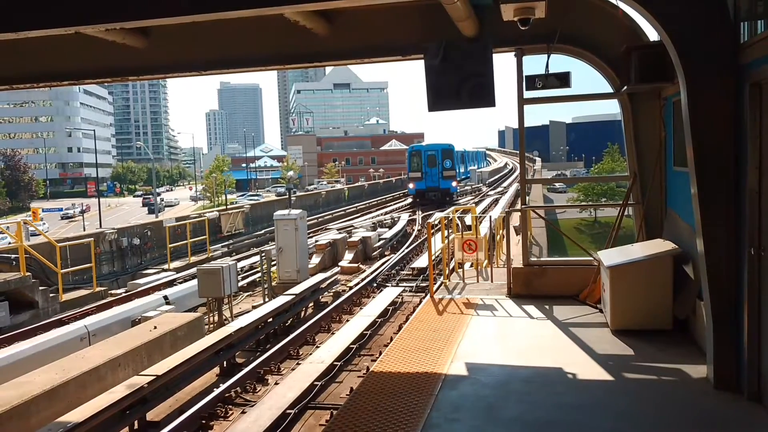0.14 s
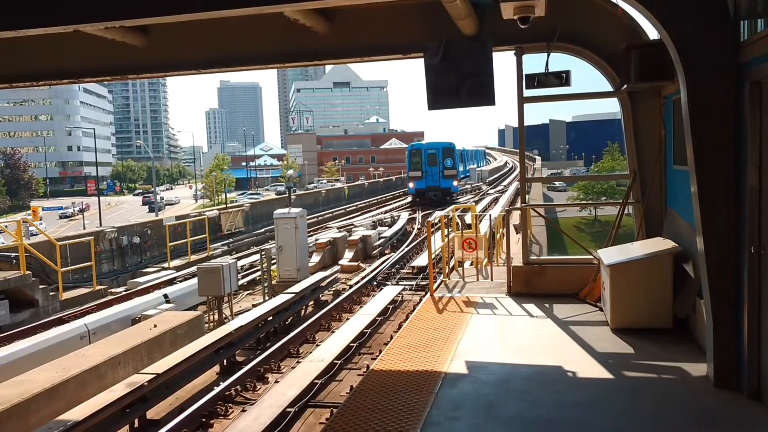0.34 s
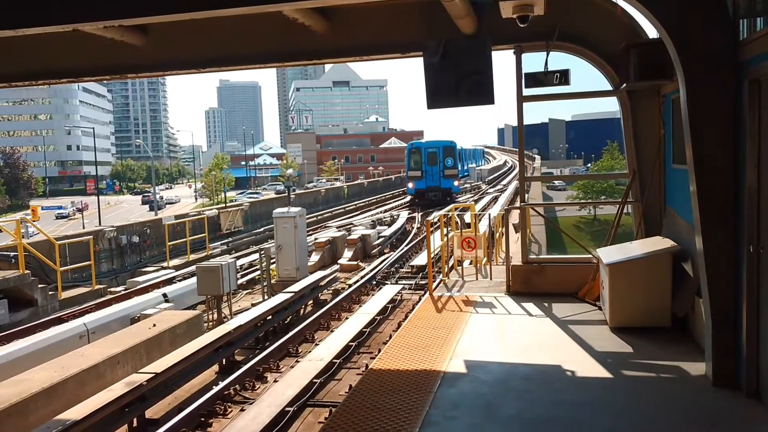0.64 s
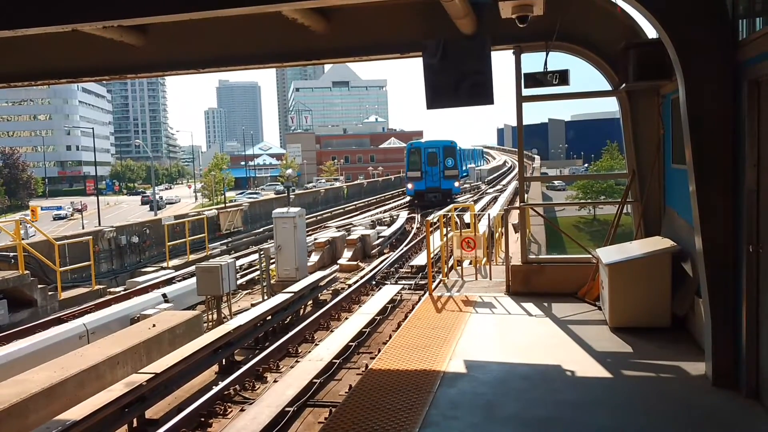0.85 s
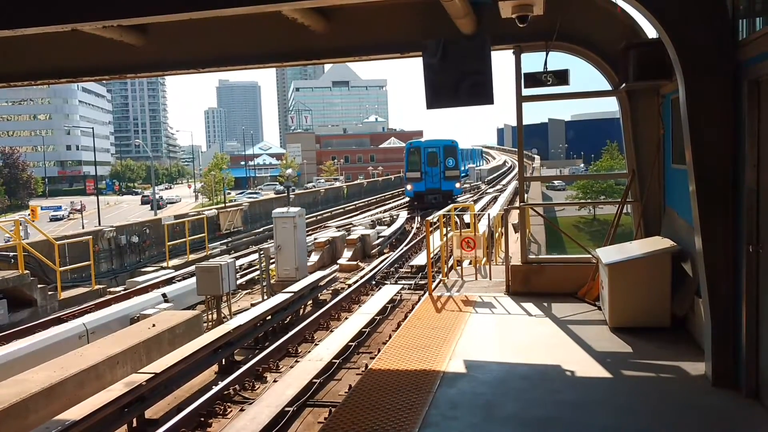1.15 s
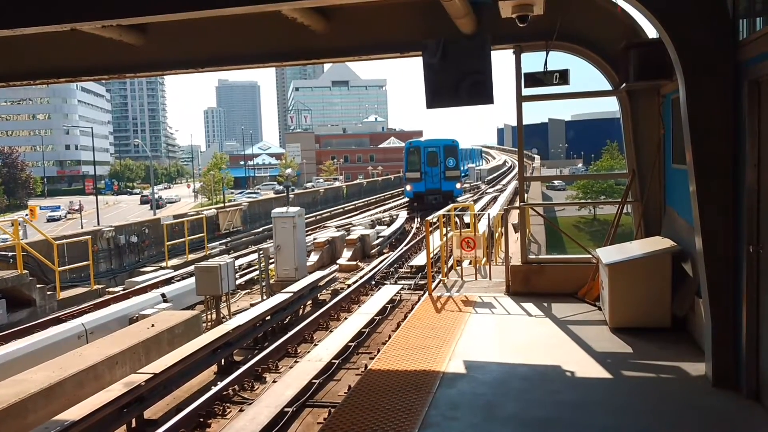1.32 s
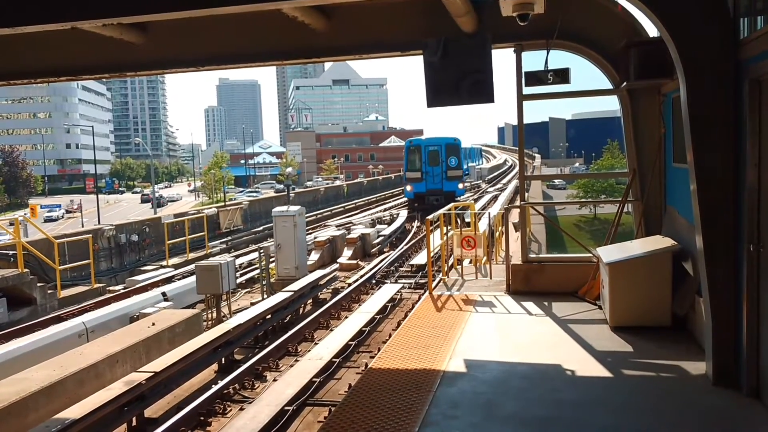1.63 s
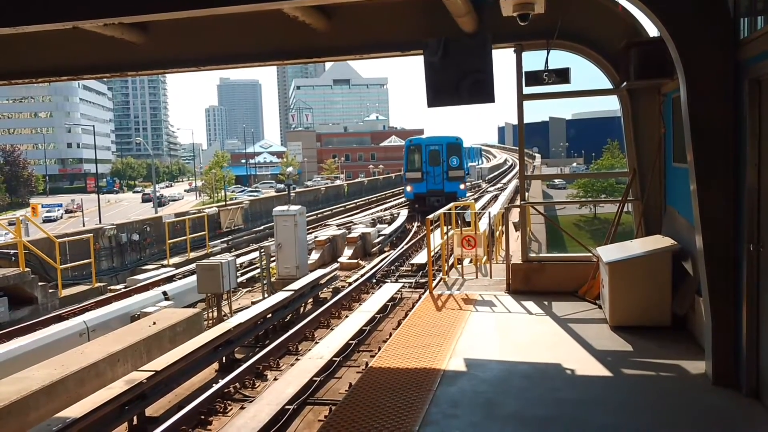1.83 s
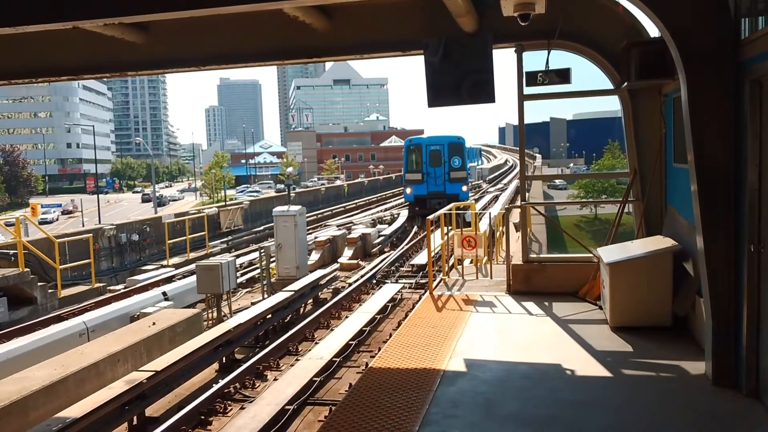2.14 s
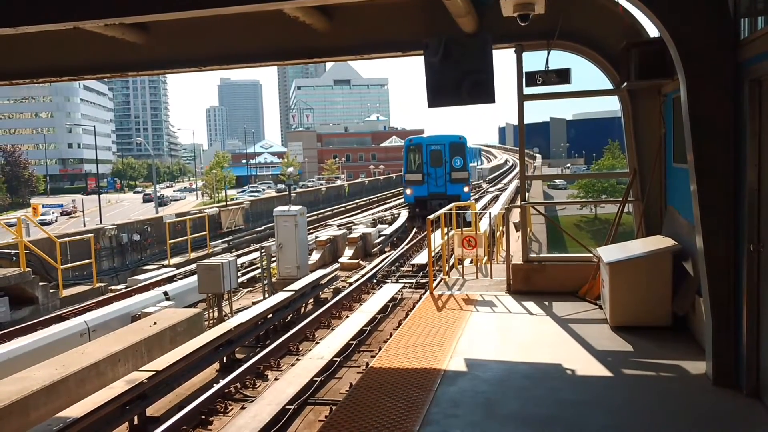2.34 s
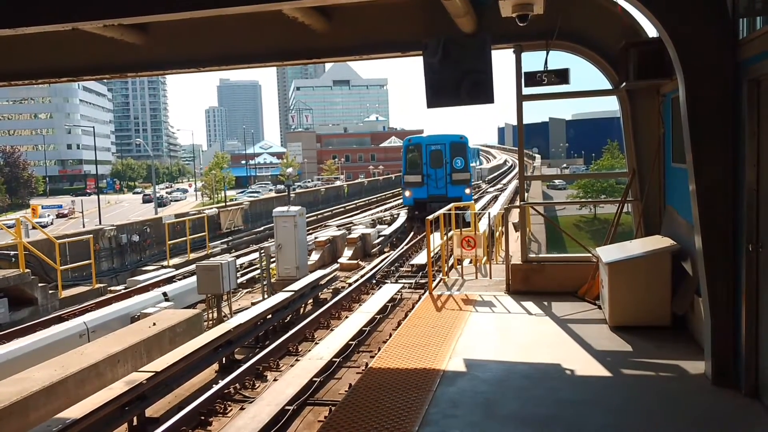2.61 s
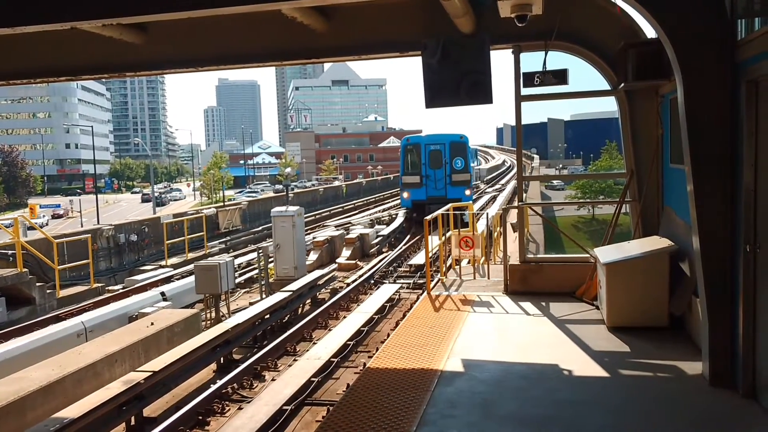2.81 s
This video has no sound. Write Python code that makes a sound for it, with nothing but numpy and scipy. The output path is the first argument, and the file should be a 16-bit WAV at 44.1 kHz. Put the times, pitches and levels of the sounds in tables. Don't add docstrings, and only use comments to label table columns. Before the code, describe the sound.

A train approaches an open elevated station: high metallic wheel squeals and scraping first, then a growing rolling roar with irregular joint thuds over low city wash, heard in stereo from the platform.

```python
import sys
import numpy as np
from scipy import signal
from scipy.fft import rfft, irfft, next_fast_len
from scipy.io import wavfile
from scipy.ndimage import uniform_filter1d

SR = 44100
rng = np.random.default_rng(int(sys.argv[2]) if len(sys.argv) > 2 else 0)


def output_pcm(signal):
    pcm = np.clip(np.atleast_2d(signal).T, -1, 1) * 32767
    wavfile.write(sys.argv[1], SR, np.round(pcm).astype(np.int16))


def amplitude_ratio(level_db):
    exponent = np.asarray(level_db, float) / 20
    return 10 ** exponent


N = 130977

# t/s, level/dB
ROLL_LEVEL = [(0, -35), (.28, -29.5), (.45, -34), (.65, -30.5), (.85, -30.5), (.98, -25.5), (1.12, -28.5),
              (1.32, -25.5), (1.5, -23), (1.64, -26.5), (1.86, -25), (2.05, -28), (2.15, -29), (2.28, -28),
              (2.42, -23), (2.68, -21.5), (2.88, -24.5), (2.97, -31.5)]
# f/Hz, level per Hz/dB
ROAR_COLOUR = [(60, -9), (250, -3), (700, -6.5), (1200, -14.5), (2500, -1.5), (3600, -16), (7500, -9),
               (11000, -23.5)]
# f/Hz, width/Hz, lift/dB
RAIL_RESONANCES = [(271.6, 35, 3.5), (423, 12, 1), (624, 120, 2.5), (830, 146, 4), (1230, 162, 5.5),
                   (1850, 200, 3), (2700, 750, 0), (3840, 81, 3), (7170, 180, 4.5)]
# t/s, level/dB, rise/s, fall/s, brightness/dB
JOINT_THUDS = [(0.491, -27, 0.0077, 0.096, -3), (.76, -28, 0.048, 0.048, -0.5),
               (1.031, -23, 0.021, 0.043, 4), (1.189, -23, 0.011, 0.075, -0.5),
               (1.42, -26, 0.026, 0.093, 1.5), (1.545, -25, 0.065, 0.03, 5), (1.76, -23, 0.055, 0.052, 2),
               (1.936, -19.5, 0.01, 0.028, 3.5), (1.99, -25.5, 0.031, 0.12, 6.5),
               (2.206, -21.5, 0.029, 0.021, -0.5), (2.325, -19, 0.011, 0.067, 0),
               (2.45, -25.5, 0.032, 0.16, 3), (2.66, -21.5, 0.024, 0.051, -4),
               (2.77, -19.5, 0.033, 0.025, -20), (2.81, -25.5, 0.035, 0.1, 7)]
# t/s, f/Hz, level/dB
RING_TONES = [(0.486, 770, -31.5), (.77, 850, -39), (1.0, 410, -32), (1.935, 1224, -23), (2.205, 230, -31),
              (2.33, 636, -31), (2.77, 722, -26), (2.48, 1220, -27.5), (0.533, 275, -31),
              (.95, 270, -31.5), (1.03, 270, -31), (2.8, 1400, -26), (2.9, 620, -30)]
WHEEL_MODES = [2507, 4170, 4595, 5868, 5955, 6470, 7340, 7547, 7620, 8325, 8640, 8730, 8850, 8895, 9165,
               10230, 10480, 10987, 11945, 12120, 12330, 13200, 14131]
# peak t/s, f/Hz, level/dB, rise/s, fall/s
SQUEAL_BURSTS = [(0.057, 14131, -12, 0.083, 0.068), (.04, 4165, -40, 0.05, 0.03),
                 (0.183, 4175, -28.5, 0.049, 0.069), (0.26, 4175, -32, 0.017, 0.064),
                 (0.484, 4165, -36, 0.02, 0.09), (.01, 4200, -41, .02, 0.024),
                 (0.15, 5865, -36.5, 0.048, 0.14), (0.237, 5956, -24, 0.016, 0.034),
                 (0.038, 7338, -29, 0.037, 0.092), (.085, 7547, -29, .02, 0.044),
                 (0.22, 7547, -25, 0.033, .04), (0.29, 8325, -33, 0.018, 0.014),
                 (0.069, 8720, -23.5, 0.013, 0.042), (0.264, 8890, -35.5, 0.055, 0.044),
                 (0.066, 6500, -38.5, 0.035, 0.04), (0.22, 9165, -37, 0.16, 0.053),
                 (0.06, 10480, -34.5, 0.05, 0.12), (0.24, 10987, -35, 0.02, 0.11),
                 (2.3, 12000, -38, 0.017, 0.027), (2.925, 12000, -29, 0.022, 0.032)]
# peak t/s, f/Hz, level/dB, rise and fall/s
EVEN_BURSTS = [(5, 6470, -46, 0.09), (2.96, 8730, -43, 0.049), (.0, 8730, -29, .03),
               (.37, 4170, -31.5, 0.052), (.35, 5955, -37.5, 0.024), (-0.3, 14131, -29, .06)]
# peak t/s, f/Hz, level/dB, rise/s, fall/s
FURTHER_BURSTS = [(.03, 2507, -29, .025, .04), (0.18, 2507, -19.5, .022, .05), (.245, 2507, -24, .012, .04),
                  (.07, 12330, -39, .1, .12), (.15, 11945, -38.5, .2, .15), (.24, 13200, -34, .02, .1),
                  (.39, 2507, -27, .03, .04), (.5, 2507, -30.5, .04, .12), (.28, 2507, -27, .015, 0.035),
                  (.01, 4595, -35.5, .03, 0.045), (0.1, 8100, -29.5, .03, 0.046), (.17, 8850, -35, .06, .08),
                  (0.296, 8850, -36, .03, 0.055), (0.087, 8325, -40, .04, 0.055),
                  (.43, 8640, -41, .04, 0.066), (.32, 14131, -42, .08, .2), (0.33, 13200, -38, .04, .07),
                  (.07, 12120, -35, .08, 0.17), (0.24, 12000, -37, .04, .07), (.15, 10230, -38, .15, .15),
                  (.12, 5900, -33.5, .03, .05), (0.27, 7547, -28, .015, .02), (.39, 7300, -32, .015, .02),
                  (0.225, 4170, -32, 0.023, 0.036), (0.535, 8325, -40, .03, .05), (0.2, 5868, -32, .03, .04)]
# t/s, level/dB
SCRAPE_LEVEL = [(0, -23.5), (.07, -34.5), (.13, -28), (.25, -23.5), (.32, -32), (.45, -33), (.6, -38),
                (2.85, -47), (2.95, -26.5)]
# f/Hz, level per Hz/dB
SCRAPE_COLOUR = [(90, -28), (600, -12.5), (2500, 3), (3600, -6.5), (7500, 1), (9500, 2), (12300, -27),
                 (14500, -29)]
# t/s, level/dB
RUMBLE_LEVEL = [(0, -35.5), (.4, -37), (.95, -29), (1.6, -28), (2.1, -29), (2.97, -27.5)]
# f/Hz, level per Hz/dB
CITY_COLOUR = [(25, -10), (50, -12), (90, -10.5), (170, 0.5), (300, 1), (450, -6), (2000, -13), (6000, -35)]
# start t/s, end t/s, f/Hz, level/dB, fade/s
ENGINE_DRONE = (.36, .84, 150.5, -36.5, .025)
# f/Hz, phase/half turns
BASS_LEAD = [(60, -.8), (130, -.45), (260, -.1), (1000, -.05), (1200, 0)]
# f/Hz, likeness/0-1
LIKENESS = [(40, 0.92), (150, 0.74), (400, 0.38), (800, 0.87), (1000, 0.84)]
# f/Hz, left minus right/dB
BALANCE = [(40, -1.5), (150, 2), (300, -1.5), (1150, 0), (2500, -1.4), (3800, 0), (4300, -4), (4950, -1.8),
           (5600, -4), (9000, -3.5), (9900, 0)]
# f/Hz, agreement/0-1
AGREEMENT = [(1500, 0.95), (3100, 0.76), (4300, 0.2), (5500, 0.2), (6600, 0.4), (8000, 0.9), (9400, .6),
             (10600, 0)]
# f/Hz, level/dB
MIC_TONE = [(20, -22), (50, 0), (9000, 0), (11300, -4), (12500, -17), (14300, -11), (15100, -48)]


def read(points, hz):
    f, value = np.transpose(points)
    return np.interp(np.log(hz + 1), np.log(f + 1), value)


def evened(x):
    return x / np.sqrt(np.mean(abs(x) ** 2) + 1e-20)


def level(curve):
    return amplitude_ratio(np.interp(np.arange(N) / SR, *np.transpose(curve)))


def swell(at, rise, fall):
    t = np.arange(N) / SR - at
    return np.where(t < 0, np.exp(-(t / rise) ** 2), np.exp(-np.maximum(t, 0) / fall))


def slow(count):
    noise = rng.standard_normal(N)
    return evened(uniform_filter1d(uniform_filter1d(noise, count), count))


def resonance(hz, centre, width):
    return 1 / (1 + (2 * (hz - centre) / width) ** 2)


def hiss(colour, patchy_db, rail=0., wheel=0.):
    hz = np.fft.rfftfreq(1024, 1 / SR)
    a, b, c, d, patches = rng.standard_normal((N // 256 + 5, 513, 5)).T
    patches = uniform_filter1d(patches, size=12, axis=0)
    patches = evened(uniform_filter1d(patches, size=8, axis=1))
    rail_lift = sum(db * resonance(hz, f, width) for f, width, db in RAIL_RESONANCES)
    wheel_lift = 8 * np.max([resonance(hz, f, 110) for f in WHEEL_MODES], axis=0)
    shape = read(colour, hz) + rail * rail_lift + wheel * wheel_lift
    spectra = np.array([a + 1j * b, c + 1j * d]) * amplitude_ratio(shape[:, None] + patchy_db * patches)
    return evened(signal.istft(spectra, nperseg=1024, noverlap=768)[1][:, :N])


def rolling():
    flicker = amplitude_ratio(0.82 * slow(count=300))
    return level(ROLL_LEVEL) * flicker * hiss(ROAR_COLOUR, patchy_db=1.5, rail=0.95)


def joints():
    t = np.arange(N) / SR
    noise = hiss(ROAR_COLOUR, patchy_db=2.5, rail=2.15)
    low = signal.sosfiltfilt(signal.butter(2, 1600, fs=SR, output="sos"), noise)
    treble = noise - low
    low_power, treble_power = np.zeros(N), np.zeros(N)
    for at, db, rise, fall, bright_db in JOINT_THUDS:
        power = amplitude_ratio(2 * db) * swell(at, rise, fall) ** 2
        low_power += power
        treble_power += power * amplitude_ratio(2 * bright_db)
    ring = np.zeros(N)
    for at, hz, db in RING_TONES:
        tone = np.sin(2 * np.pi * hz * t + 1.08 * slow(count=250))
        ring += amplitude_ratio(db) * swell(at, rise=0.019, fall=0.029) * tone
    return low * np.sqrt(low_power) + treble * np.sqrt(treble_power) + ring


def squeal():
    t, out = np.arange(N) / SR, np.zeros(N)
    power = np.zeros((len(WHEEL_MODES), N))
    for at, hz, db, *times in SQUEAL_BURSTS + EVEN_BURSTS + FURTHER_BURSTS:
        nearest = np.argmin(abs(np.array(WHEEL_MODES) - hz))
        power[nearest] += 2 * (amplitude_ratio(db) * swell(at, times[0], times[-1])) ** 2
    for hz, drive in zip(WHEEL_MODES, power):
        tone = np.exp(1j * (2 * np.pi * hz * t + .45 * slow(count=900)))
        partner = amplitude_ratio(-8.5) * np.exp(2j * np.pi * (.004 * hz * t + rng.random()))
        fuzz_db = -5 if 10000 < hz < 13500 else -12
        fuzz = amplitude_ratio(fuzz_db) * (slow(count=180) + 1j * slow(count=180))
        wobble = amplitude_ratio(1.2 * slow(count=400))
        out += (tone * (1 + partner + fuzz) * wobble * np.sqrt(drive)).real
    return out


def scrape():
    return level(SCRAPE_LEVEL) * hiss(SCRAPE_COLOUR, patchy_db=4, wheel=0.57)


def city_and_rumble():
    return level(RUMBLE_LEVEL) * hiss(CITY_COLOUR, patchy_db=2.5, rail=0.49)


def drone():
    start, end, hz, db, fade = ENGINE_DRONE
    t = np.arange(N) / SR
    fade_in = 1 / (1 + np.exp((start - t) / fade))
    fade_out = 1 / (1 + np.exp((t - end) / fade))
    slip = np.array([0 * t, 4.2 - 5.6 * t])
    return amplitude_ratio(db) * fade_in * fade_out * np.sin(2 * np.pi * hz * t + slip)


def scene():
    sound = rolling() + joints() + scrape() + city_and_rumble() + drone()
    size = next_fast_len(N + 2000)
    hz = np.fft.rfftfreq(size, 1 / SR)
    direct, diffuse = rfft(sound, size)
    tones = rfft(squeal(), size)

    lag_s, lag_from_hz = .0004, 1236
    half_phase = np.pi / 2 * read(BASS_LEAD, hz) + np.pi * lag_s * np.maximum(hz - lag_from_hz, 0)
    agree = np.where(hz < lag_from_hz, 1, np.clip(read(AGREEMENT, hz), 0, 1))
    bass_share = np.clip((1180 - hz) / 200, 0, 1)
    same = 1 - (1 - np.clip(read(LIKENESS, hz), 0, 1)) * bass_share

    mid = np.cos(half_phase) * (direct + tones)
    blurred = agree * direct + np.sqrt(1 - agree ** 2) * diffuse
    side = -1j * np.sin(half_phase) * (blurred + tones)
    left = same * (mid + side) + np.sqrt(1 - same ** 2) * diffuse
    left = left * amplitude_ratio(read(BALANCE, hz))
    right = mid - side
    return irfft(np.array([left, right]), size)[:, :N]


def top_cut(x):
    return signal.sosfilt(signal.butter(12, 15170, fs=SR, output="sos"), x)


def record(dry):
    size = next_fast_len(N + 2000)
    tone = amplitude_ratio(read(MIC_TONE, np.fft.rfftfreq(size, 1 / SR)))
    mix = irfft(rfft(dry, size) * tone, size)[:, :N]
    return top_cut(mix)


dry = scene()
out = record(dry)
output_pcm(out)
```